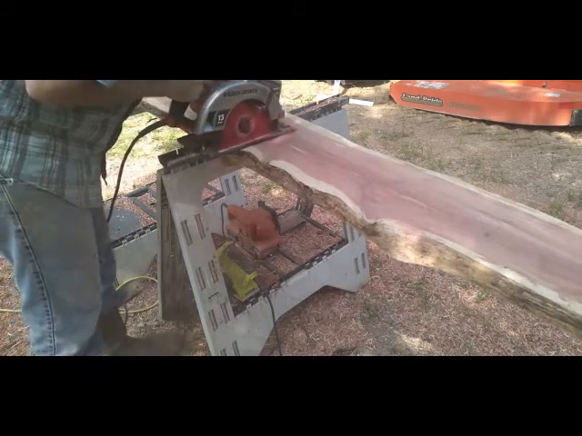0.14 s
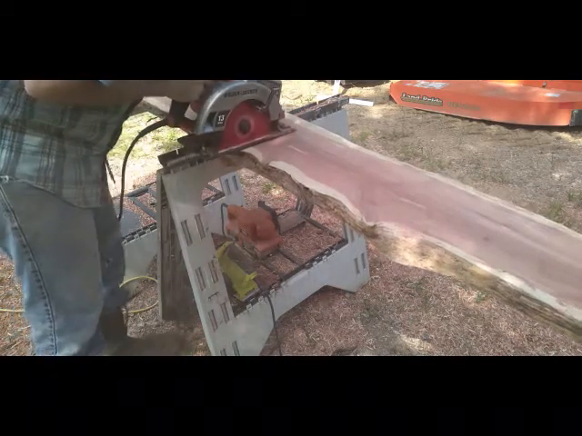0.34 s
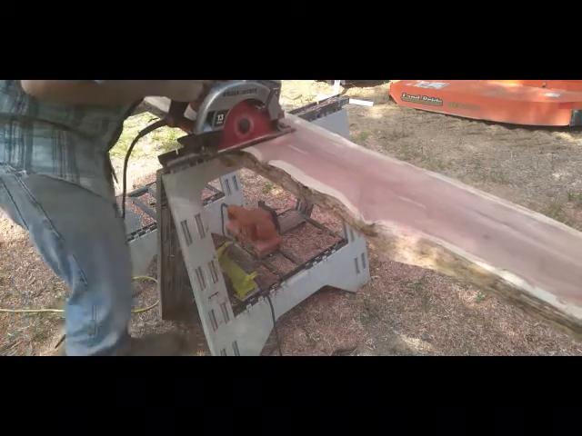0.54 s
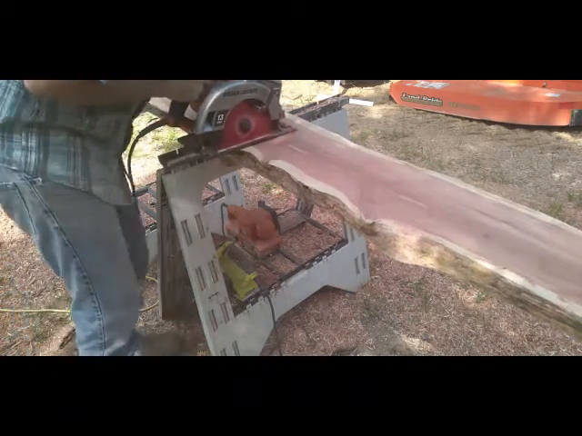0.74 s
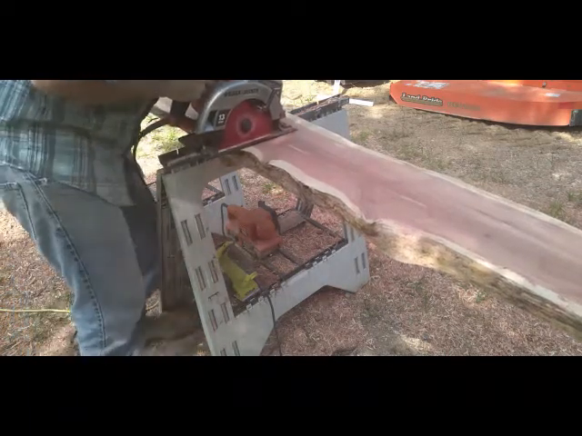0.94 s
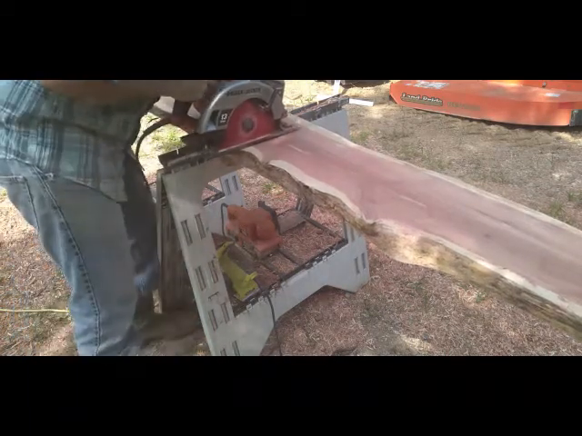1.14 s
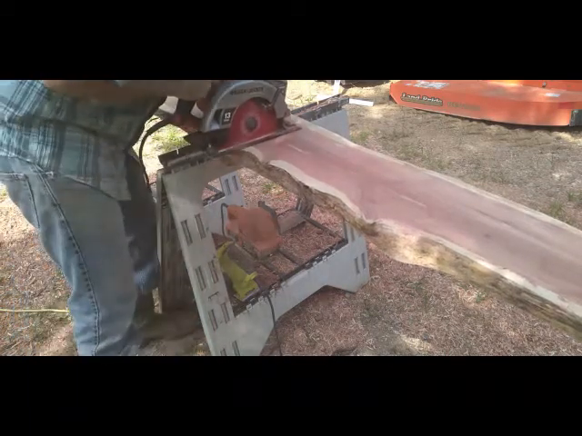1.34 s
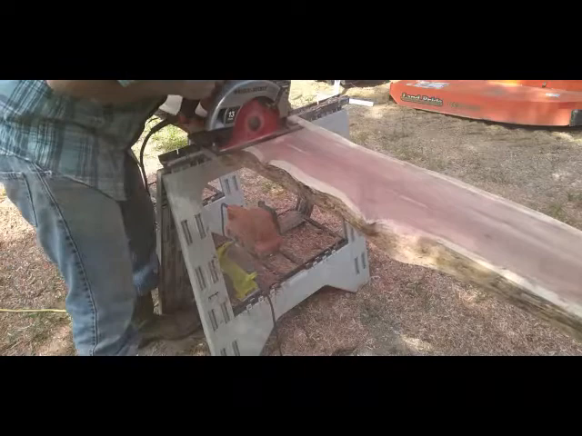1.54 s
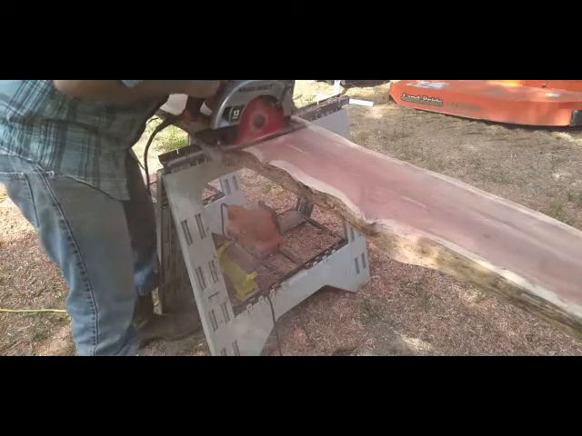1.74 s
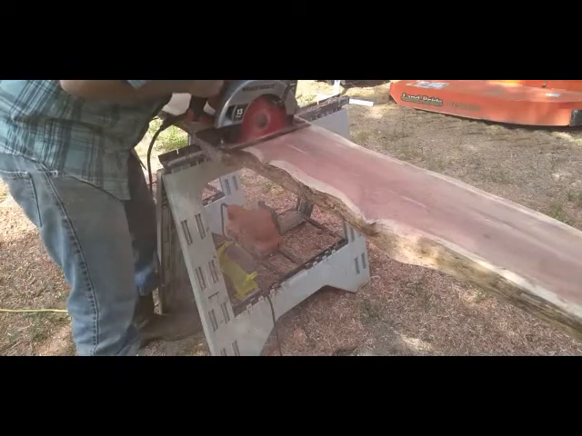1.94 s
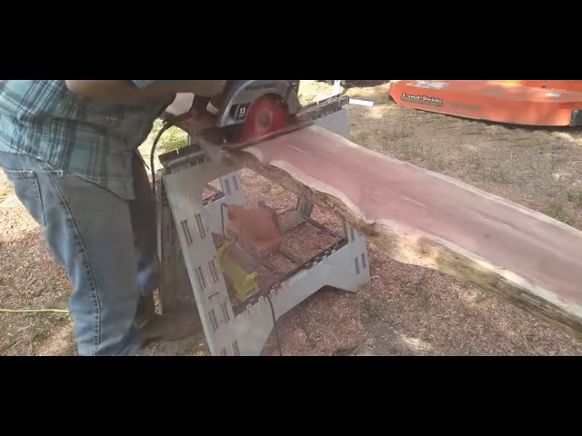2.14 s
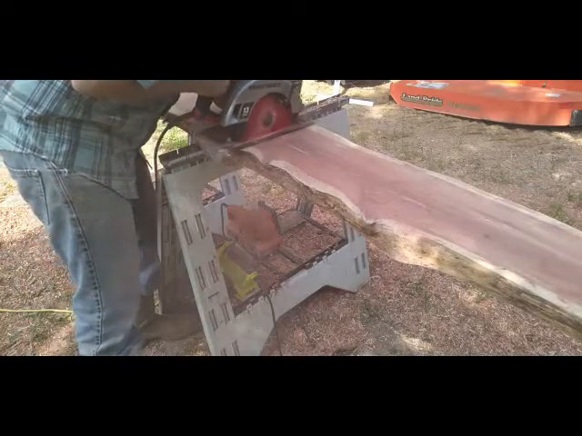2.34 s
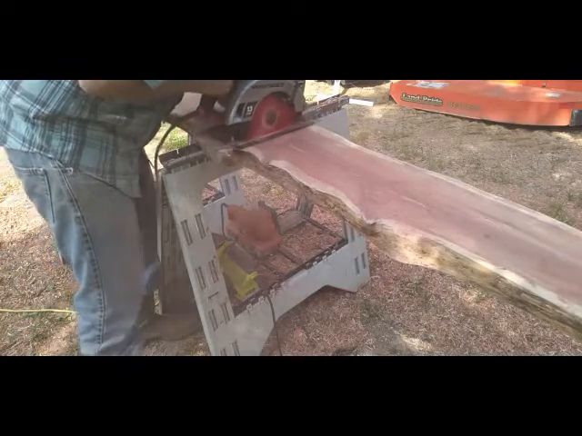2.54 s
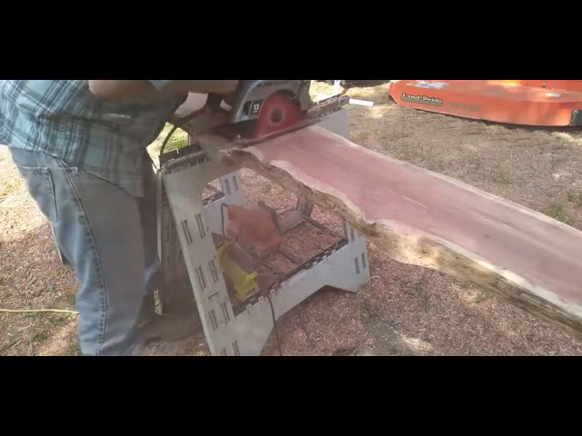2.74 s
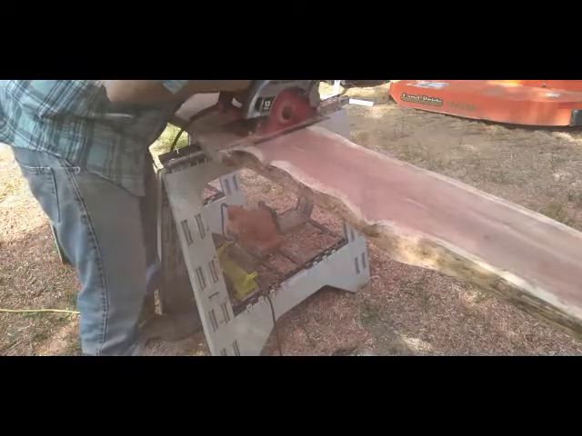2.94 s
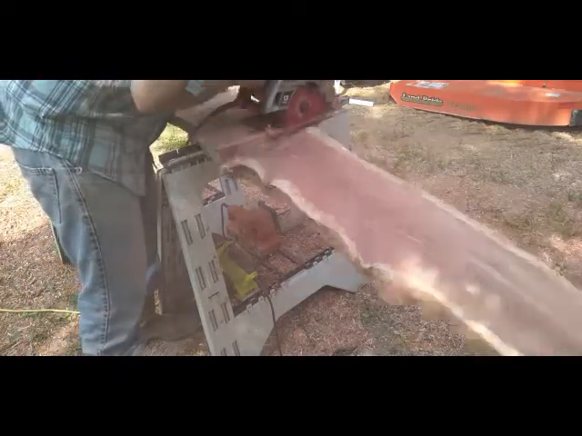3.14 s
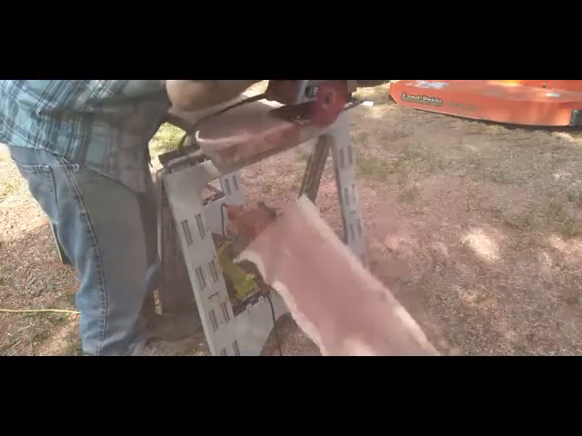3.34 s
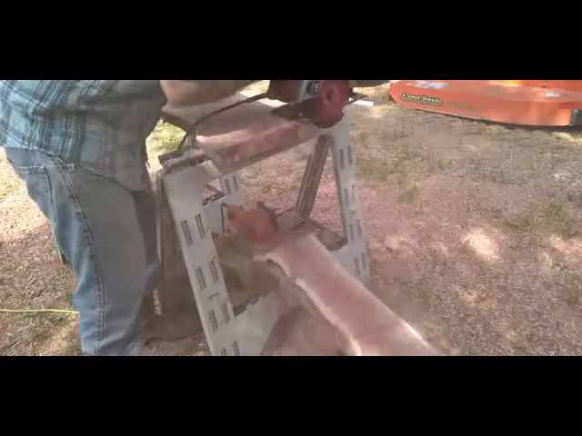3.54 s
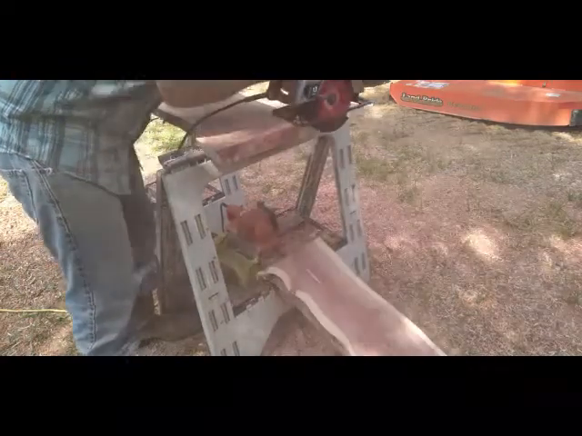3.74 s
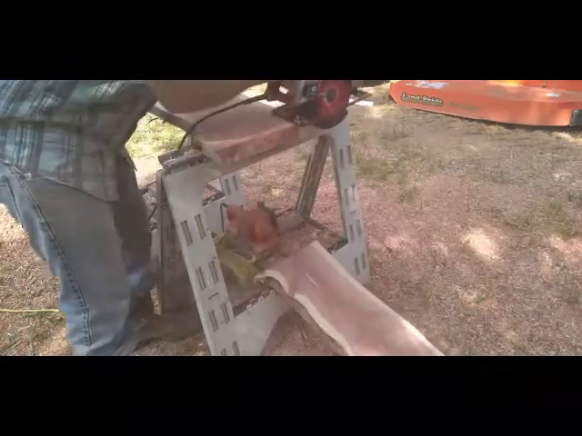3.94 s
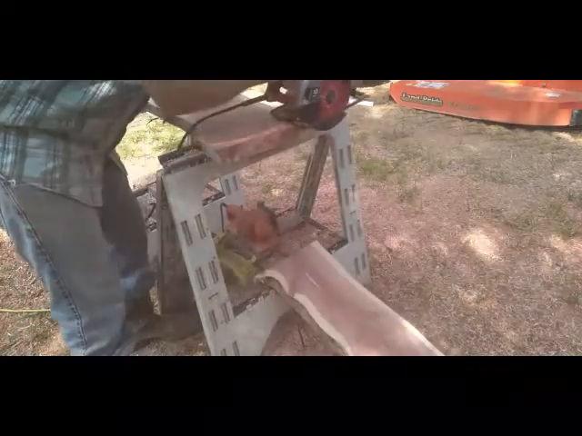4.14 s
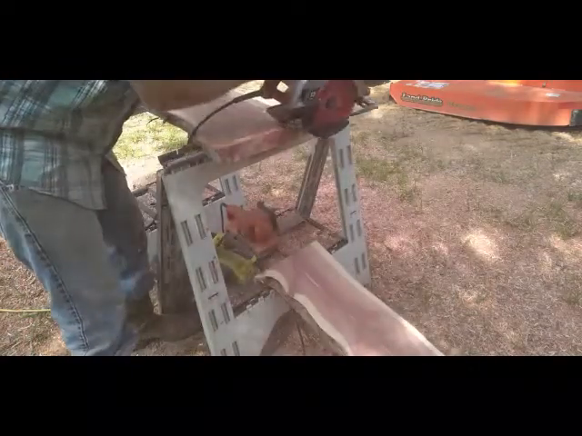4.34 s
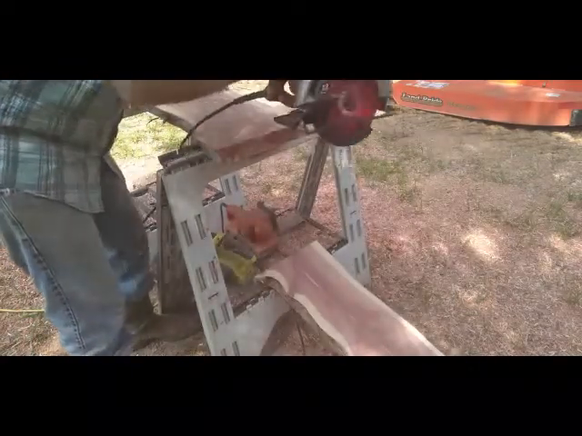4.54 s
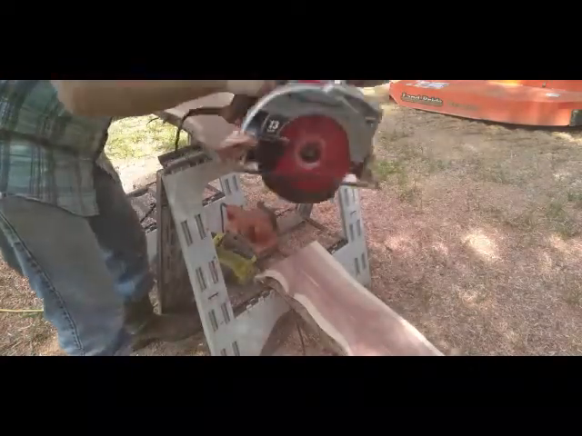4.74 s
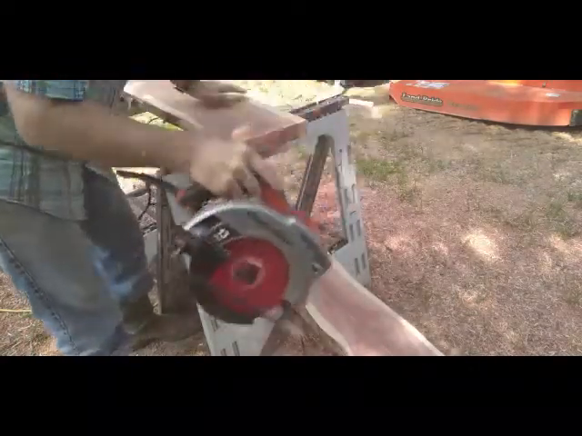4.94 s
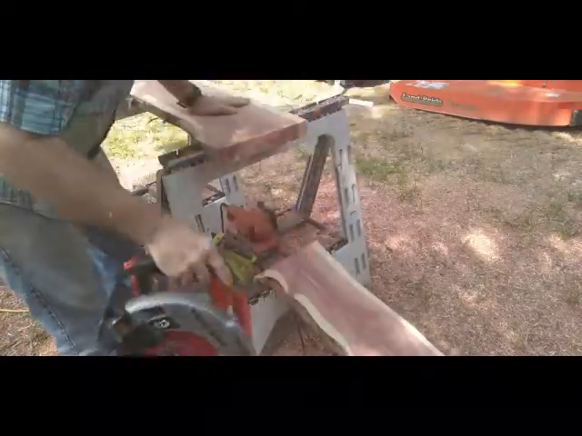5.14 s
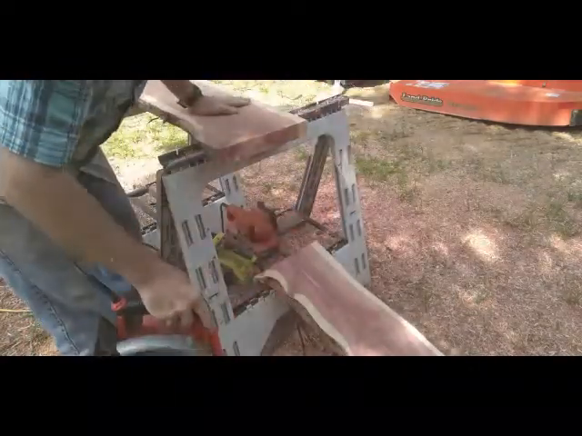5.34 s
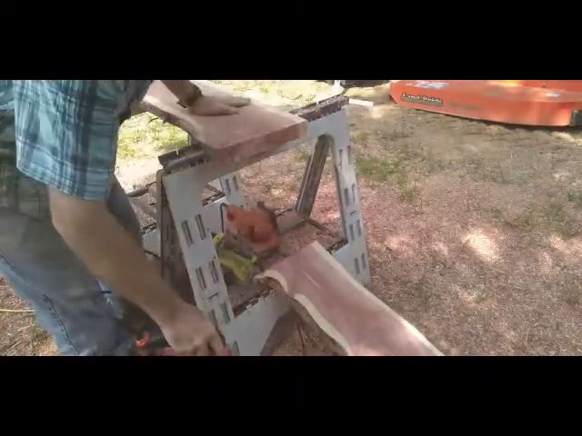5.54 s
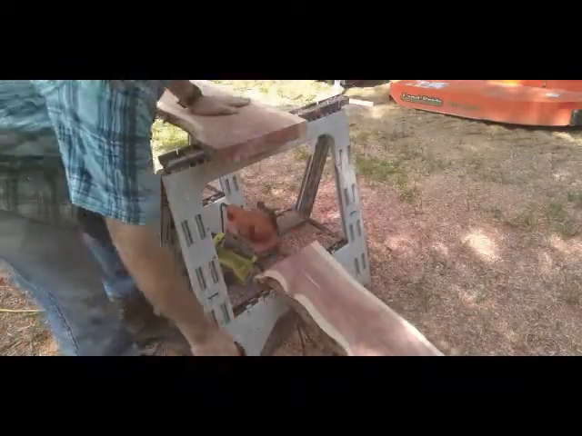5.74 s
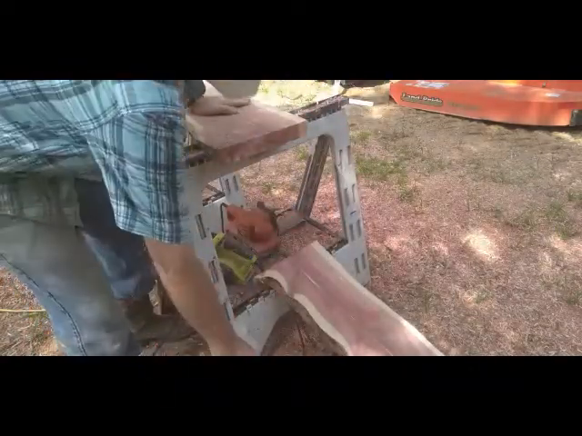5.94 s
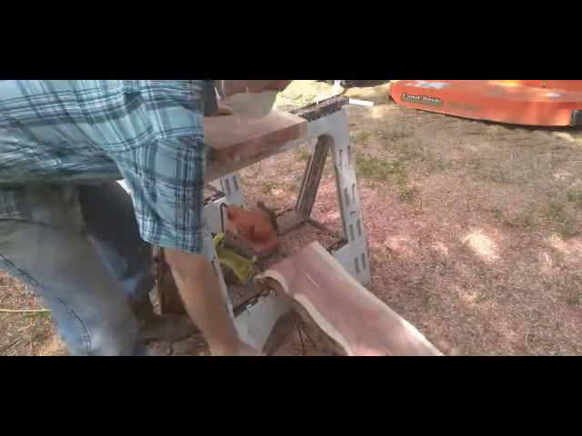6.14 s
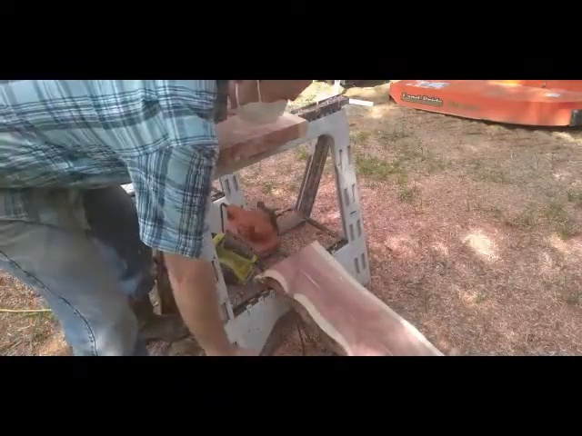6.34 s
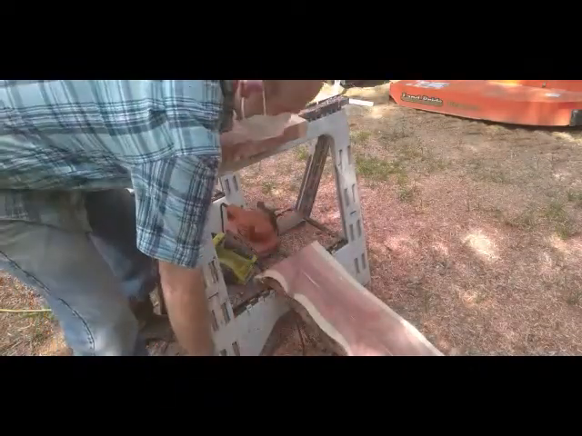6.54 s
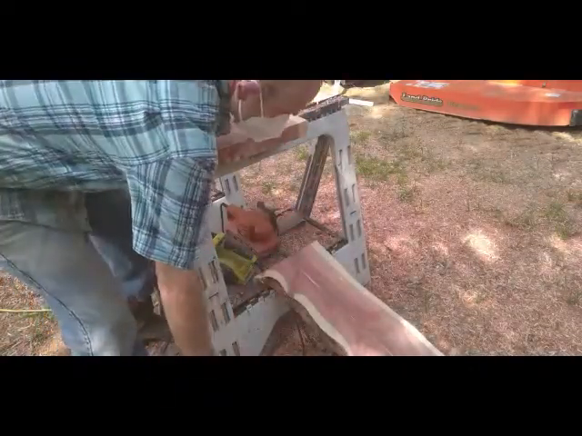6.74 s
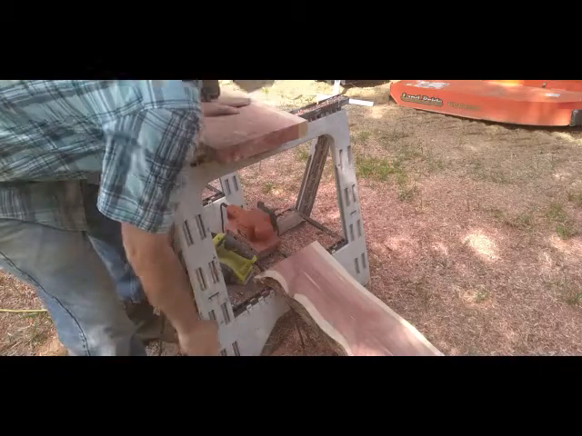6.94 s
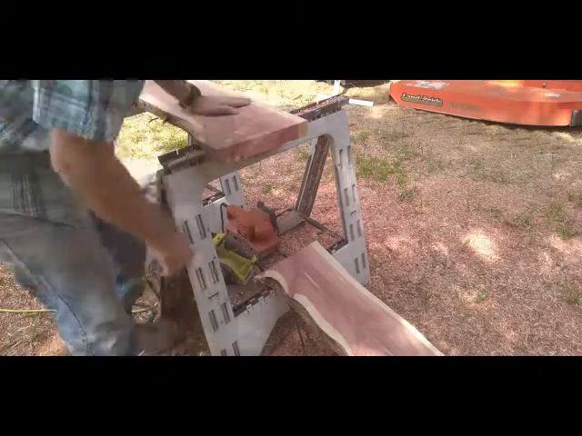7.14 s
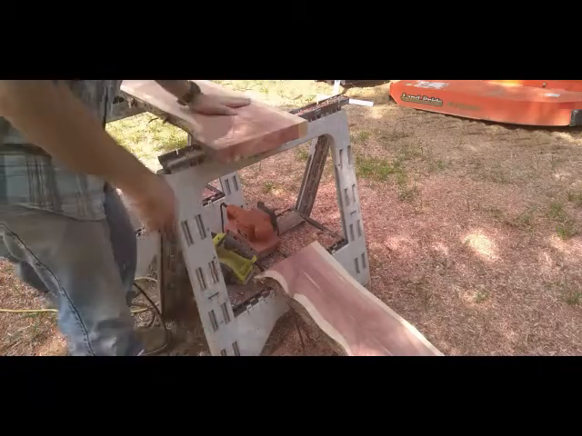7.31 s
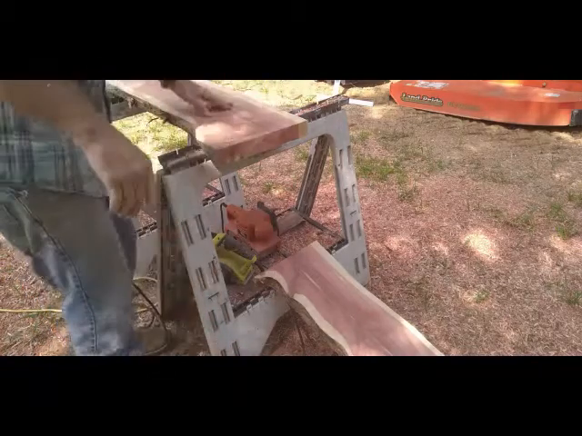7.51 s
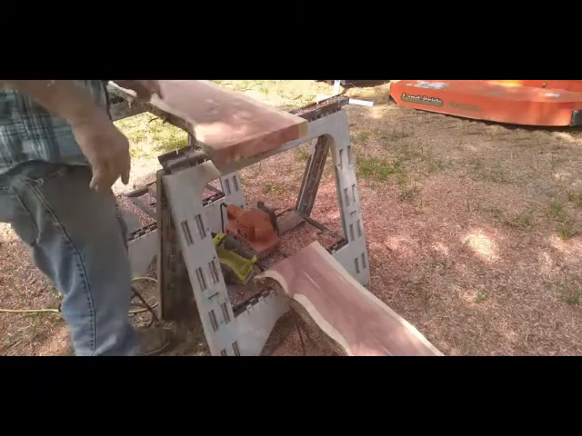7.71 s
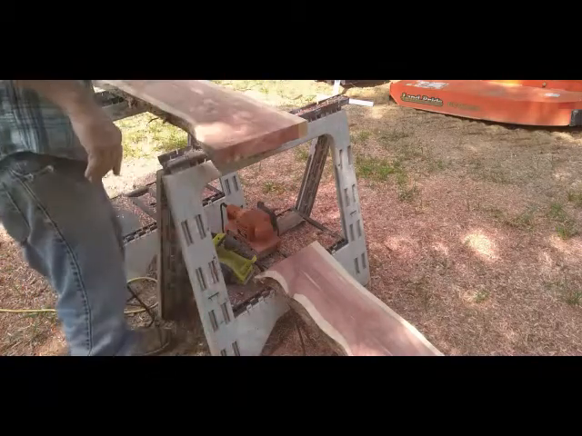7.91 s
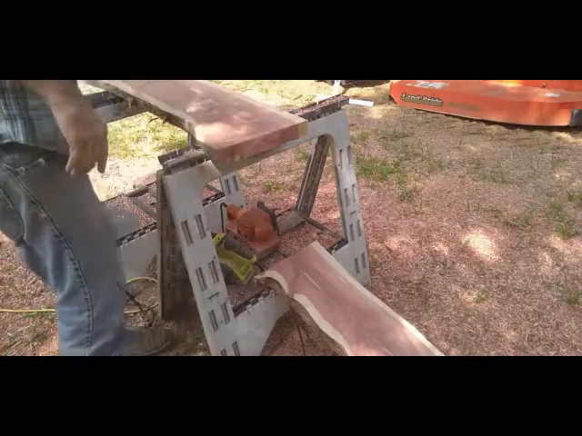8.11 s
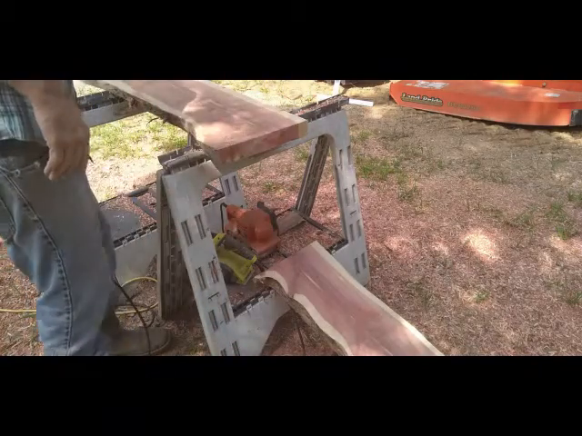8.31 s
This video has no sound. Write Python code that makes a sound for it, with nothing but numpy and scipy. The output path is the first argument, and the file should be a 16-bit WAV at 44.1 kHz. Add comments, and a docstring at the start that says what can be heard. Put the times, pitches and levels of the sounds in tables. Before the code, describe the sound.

From the start, a circular saw cuts loudly through a thick wooden slab outdoors: a high, ringing blade scream over a rough drone and low rumble, the motor's pitch wavering and sagging under load. At about 3.2 seconds the blade comes free with a short scrape and the motor races up. At 3.4 seconds the offcut thuds on the ground and bounces quickly, settling before 4 seconds. From about 3.6 seconds the saw coasts, its gear whine, rattle, fan hiss and thin blade whistle falling and fading with a pulsing flutter. Near 6.9 seconds it is set down with a sharp knock and a small clatter. Faint gear ticks follow until about 7.9 seconds, leaving quiet garden air and one barely audible bird note near the end. The close stereo microphone overloads on the loudest peaks and catches light wind gusts in the second half.

```python
"""A circular saw screams and drones through a thick slab outdoors, its teeth tearing chips that ring
the blade. The offcut drops, and the motor races free, then coasts while the saw is lowered and set on
the ground. The gears whine through the housing, the fan hisses and the blade teeth whistle.
A small stereo microphone overloads on the loudest peaks and catches some wind."""
import sys
import numpy as np
from scipy import signal
from scipy.fft import rfft, irfft, next_fast_len
from scipy.io import wavfile
from scipy.ndimage import uniform_filter1d, map_coordinates

SR = 44100
rng = np.random.default_rng(int(sys.argv[2]) if len(sys.argv) > 2 else 0)


def to_wav(sig):
    """Store sig (one row per channel, or 1-D mono) as 16-bit WAV at the path in sys.argv[1].

    Samples outside -1..1 are clipped; the rate is SR.
    """
    pcm = np.clip(np.atleast_2d(sig), -1, 1) * 32767
    pcm = np.round(pcm).astype(np.int16)
    wavfile.write(sys.argv[1], SR, pcm.T)  # frames by channels


N = 373516
T = np.arange(N) / SR
FFT_SIZE = next_fast_len(N + SR // 4)
HZ = np.arange(FFT_SIZE // 2 + 1) * SR / FFT_SIZE + 0.0013
SIDES = np.array([[.5], [-.5]])  # shares a gap in dB between left and right

# The motor, bogged down in the wood, then racing free: (time [s], speed [turns/s])
POWERED_SPEED = [(0.0, 206.7), (0.6, 222), (1.0, 226.8), (1.2, 217.2), (1.6, 204.3), (2.2, 198.4),
                 (2.55, 204.5), (2.8, 191.7), (3.0, 178.7), (3.15, 186.4), (3.25, 351), (3.35, 390),
                 (3.45, 413), (3.55, 429.5)]
# Levels during the cut: (time [s], blade's scream [dB], low rumble at the microphone [dB])
CUT_LEVELS = [(0.0, -2.5, -28), (0.96, -8, -31.5), (1.1, -8, -29.5), (1.75, -9.5, -41), (2.2, -11, -40),
              (2.54, -9.5, -39.5), (2.85, -10, -30.5), (3.04, -9.5, -30.5), (3.19, -12, -37.5),
              (3.28, -23, -73)]
# Modes, the pitches at which a part rings: (pitch [Hz], width [Hz], gain [dB], left minus right [dB])
BLADE_MODES = [(1366, 83, -38.5, -2), (1667, 320, -5.5, 2.5), (2758, 170, -21.5, -5), (3220, 85, -10, 6.5),
               (4165, 73, -9.5, -1), (4607, 80, -13.5, 2.5), (5236, 100, -9, -2.5), (5685, 100, -13.5, 7),
               (6303, 74, -12.5, 14.5), (6786, 63, -15, 11.5), (7265, 43, -7.5, 15), (7865, 96, -5, 16),
               (8184, 150, -5, 16), (8616, 110, 0.5, 13.5), (9080, 170, 2, 10.5), (9985, 260, 3, 7.5),
               (10670, 130, 2, -7), (11180, 82, 1.5, -0.5), (11650, 230, -4.5, -5.5),
               (12480, 360, -4.5, -7)]
HOUSING_MODES = [(570, 185, -0.5, 0.5), (806, 180, 4.5, 2), (1073, 410, 2, -2), (1496, 140, 5.5, 1.5),
                 (1780, 790, -5, -5), (2093, 110, 7.5, 4), (2232, 93, 8, -7), (2473, 39, 7.5, 4.5),
                 (2667, 220, 4.5, -4), (3350, 72, -13, 0), (3368, 130, 1.5, -4), (3800, 180, -4, 14.5),
                 (4473, 270, -5.5, -18), (5230, 290, -1, 17.5), (5810, 63, -1.5, 17), (6360, 320, -3, 18.5),
                 (7100, 110, -3, 27.5), (7870, 210, 6.5, 16.5), (8970, 470, -0.5, 19),
                 (10110, 260, -10, -17), (10180, 150, 0.5, -21.5), (10985, 130, 4.5, -26)]
SLAB_MODES = [(124, 77, -7, 0.0099), (166, 13, -1, 0.0043), (217, 39, -0.5, 0.001), (285, 29, 6.5, 0.012),
              (310, 22, 7.5, 0.0031), (357, 57, 0.5, 0.01), (486, 13, 4.5, 0.0083), (620, 76, -5, 0.013),
              (937, 1500, -8, 0.003), (1577, 320, -30, 0.011)]
# Colours, how strong each noise is from bass to treble: (frequency [Hz], gain [dB])
CHIP_COLOUR = [(1530, -52.5), (2600, -56), (3360, -10.5), (4370, -18.5), (5160, -28), (5730, -36),
               (6220, -14), (9410, -3), (15700, -9.5)]
DRONE_COLOUR = [(260, -50), (450, -15), (827, -2.5), (1050, -2), (2060, -3.5), (2430, -10.5), (2600, 4),
                (3380, -45), (5720, -120)]
RUMBLE_COLOUR = [(15, -48), (32, -33), (70, -1.5), (134, 2.5), (221, -2.5), (361, -2.5), (500, -9.5),
                 (650, -41.5), (1100, -120)]
RATTLE_COLOUR = [(210, -50), (350, -17), (578, -14.5), (1450, -6), (1760, -8), (3480, -13.5), (4000, -16),
                 (4500, -15), (5850, -33), (9900, -120)]
HISS_COLOUR = [(1760, -24), (3000, -3.5), (3540, -3.5), (4040, -6.5), (4510, -9), (4870, -8.5), (5260, -7),
               (10900, -0.5), (15700, -28)]
GARDEN_COLOUR = [(180, -35.5), (300, -4.5), (680, -11), (884, -5), (1170, -16), (10500, -13),
                 (13400, -24.5), (15000, -12)]
WIND_COLOUR = [(12, -66.5), (20, -30), (78, -1.5), (134, -9.5), (211, -24.5), (278, -23), (400, -39.5),
               (520, -57.5), (880, -120)]
# The housing as the saw is lifted, turned and lowered: (time [s], relative level [dB])
HOUSING_LEVELS = [(3.16, -25.5), (3.3, -26), (3.39, -22), (3.52, -17), (3.75, -19), (4.26, -23),
                  (4.65, -20), (4.81, -18), (5.11, -24), (5.42, -29), (5.9, -30), (6.07, -32.5),
                  (6.28, -29.5), (6.65, -34), (6.85, -38), (7.13, -33.5), (7.28, -33.5), (7.59, -41),
                  (7.77, -54), (8.1, -74)]
# Brief dips in the gear and fan sound: (middle [s], length [s], change [dB])
LEVEL_DIPS = [(3.273, .08, -1), (6.469, 0.055, -5), (6.892, 0.017, 0), (7.05, 0.045, -13.5)]
# Moments when one housing mode sings out: (middle [s], length [s], pitch [Hz], level [dB])
HOUSING_SURGES = [(3.714, 0.7, 2764, -18.5), (3.734, 0.26, 3300, -21.5), (3.903, 0.17, 5370, -33),
                  (4.18, 0.86, 2315, -27.5), (4.236, 0.23, 4510, -33), (4.792, 0.48, 1760, -24),
                  (5.138, 0.052, 9240, -27), (5.398, 0.18, 7810, -32), (5.664, 0.34, 10380, -36),
                  (5.86, 0.13, 9900, -35), (5.843, 0.38, 2250, -42), (5.938, 0.19, 2954, -34),
                  (6.1, 0.21, 2770, -29), (6.38, 0.15, 1580, -33), (6.746, 0.77, 550, -39.5),
                  (6.693, 0.34, 2670, -34.5), (6.82, 0.18, 1067, -48), (7.298, 0.49, 2350, -41.5),
                  (7.253, 0.54, 1410, -42), (7.605, 0.19, 556, -48.5)]
# Motor tones that swell and fade: (middle [s], length [s], order [cycles/turn], level [dB])
MOTOR_TONES = [(0.0, 0.54, 8, -23), (0.63, .8, 7, -31), (0.87, 0.84, 6, -25.5), (1.1, 0.22, 7, -29),
               (1.31, .6, 8, -27.5), (2.8, 0.28, 8, -33), (0.4, .5, 24, -29), (0.2, .6, 32, -24),
               (0.3, .3, 39, -28.5), (0.5, .35, 32, -28), (.95, .25, 16, -35), (1.25, .5, 32, -33),
               (1, .5, 39, -34), (4.5, .37, 7, -30), (4.62, .2, 21, -35), (4.9, .3, 14, -34),
               (5.0, .15, 28, -37), (5.6, .3, 21, -38), (5.87, .27, 14, -35), (5.85, .3, 21, -41),
               (6.1, .5, 42, -43), (6.32, .32, 14, -37), (6.78, .22, 14, -44), (7.16, .18, 14, -44),
               (7.29, .24, 21, -43), (7.38, .2, 14, -48)]
# The whistle of the blade teeth: (time [s], level [dB])
WHISTLE_LEVELS = [(3.25, -53), (3.52, -25.5), (3.7, -27), (3.9, -35), (4.1, -26.5), (4.3, -30),
                  (4.7, -35.5), (5.0, -38), (5.3, -52), (5.75, -69), (7.0, -85), (7.3, -75)]
# The band lifted by the echo off the ground: (time [s], pitch [Hz], level [dB])
GROUND_BAND = [(4.8, 520, -66), (5.0, 586, -34), (5.4, 658.5, -39), (5.9, 745, -43), (6.3, 816, -43),
               (6.5, 834, -49)]
# The offcut lands and bounces: (time [s], relative level [dB], length of the push [ms])
OFFCUT_BOUNCES = [(3.401, -3.5, 5.5), (3.437, -13, 0.71), (3.466, -10.5, 2.34), (3.493, -10, 0.99),
                  (3.521, -11, 1.4), (3.611, -15, 1.4), (3.646, -17.5, 1.8), (3.712, -19.5, 1.7),
                  (3.766, -25.5, 1.3), (3.808, -38.5, 1.8), (3.851, -37, 1)]
# The saw set down, then the last gear ticks: (time [s], relative level [dB], pitch [Hz])
HOUSING_KNOCKS = [(6.919, 4, 923), (6.949, -14, 1310), (6.988, -8.5, 1430), (7.01, -13, 2320),
                  (7.072, -25, 2500), (7.107, -22, 1370), (7.724, -32, 950), (7.746, -36, 1000),
                  (7.775, -36, 985), (7.815, -43, 1000), (7.83, -35, 1300), (7.861, -37, 897),
                  (7.881, -40, 980), (7.904, -42.5, 980)]
# Scrapes, rustles and one faint bird note: (start [s], length [s], level [dB], centre [Hz], width [Hz])
RUSTLES_AND_BIRD = [(3.12, 0.14, -31, 1110, 89), (3.11, 0.18, -33, 1483, 90), (3.1, 0.081, -17, 8900, 6000),
                    (3.315, .08, -20, 8500, 6000), (6.908, 0.15, -33, 7500, 6000),
                    (6.925, .12, -35, 1300, 1800), (2.05, .3, -33, 1050, 220),
                    (7.56, 0.056, -50, 8900, 5500), (8.29, 0.07, -55, 9500, 8000),
                    (8.2, 0.16, -63.5, 260, 900), (8.18, 0.11, -70.5, 2400, 79),
                    (8.42, 0.055, -71, 2200, 96)]
# Gusts on the microphone: (middle [s], length [s], level [dB])
GUSTS = [(5.367, 0.26, -36.5), (5.66, 0.28, -54), (5.833, 0.11, -60), (6.016, 0.082, -53), (6.3, 0.54, -46),
         (6.714, 0.079, -49), (6.996, 0.24, -53.5), (7.234, 0.23, -47.5), (8.242, 0.13, -63.5),
         (8.48, 0.079, -37)]

PINION_TEETH, GEAR_TEETH, BLADE_TEETH = 7, 40, 60  # the pinion is the small gear on the motor
GEAR_RATIO = PINION_TEETH / GEAR_TEETH  # blade turns for each motor turn


def undb(db):
    """Turn decibels into a factor to multiply by."""
    return 10 ** (np.asarray(db) / 20)


def unit(x):
    """Scale a sound to an average power of 1."""
    return x / np.sqrt(np.mean(x ** 2))


def curves(table, outside=-120.):
    """A table's columns at every sample; `outside` fills in before and after its times."""
    times, *columns = np.transpose(table)
    return [np.interp(T, times, column, outside, outside) for column in columns]


def bump(middle, length):
    """An arch: 1 in the middle of an event, 0 at its ends, negative beyond them."""
    return 1 - ((T - middle) / (length / 2)) ** 2


def wander(rate):
    """Glide to a new random value `rate` times a second, with a spread near 1."""
    hold = int(SR / rate)
    return 1.62 * uniform_filter1d(np.repeat(rng.standard_normal(N // hold + 1), hold), hold)[:N]


def noise(apart_hz):
    """Stereo noise, alike on both sides in the bass and unrelated above apart_hz."""
    shared, *own = rfft(rng.standard_normal((3, N)), FFT_SIZE)
    alike = lowpass(apart_hz, 2)
    return irfft(shared * np.sqrt(alike) + np.array(own) * np.sqrt(1 - alike), FFT_SIZE)[:, :N]


def through(x, response):
    """Filter a sound: multiply each frequency by its own gain."""
    return irfft(rfft(x, FFT_SIZE) * response, FFT_SIZE)[..., :N]


def lowpass(hz, steep):
    """A filter that keeps what lies below hz."""
    return 1 / (1 + (HZ / hz) ** steep)


def highpass(hz):
    """A filter that keeps what lies above hz."""
    return 1 / (1 + (hz / HZ) ** 4)


def bandpass(hz, width):
    """A filter that keeps what lies around hz."""
    return 1 / (1 + ((HZ - hz ** 2 / HZ) / width) ** 2)


def resonance(hz, width):
    """A filter that rings at hz; the narrower it is, the longer it rings."""
    return 1 / (1 + 1j * (HZ - hz ** 2 / HZ) / width)


def modes(table, steep=1):
    """A stereo filter of many resonances; steep=2 deepens the valleys between them."""
    return sum((-1) ** k * undb(db + SIDES * pan_db) * resonance(hz, width) ** steep
               for k, (hz, width, db, pan_db) in enumerate(table))


def colour(table):
    """A broad filter drawn through the points of a colour table."""
    hz, db = np.transpose(table)
    return undb(np.interp(np.log(HZ), np.log(hz), db, -90, -90))


def blows(hits, tail_s=0):
    """A smooth push for each (time [s], level [dB], length [ms]); tail_s smears it into fading noise."""
    out = np.zeros(N)
    for start, db, length_ms in hits:
        push = np.hanning(int(length_ms / 1000 * SR) + 3)
        push /= np.sqrt(len(push))
        if tail_s:
            fade = np.exp(-np.arange(int(5 * tail_s * SR)) / (tail_s * SR))
            push = np.convolve(push, rng.standard_normal(len(fade)) * fade)
        out[int(start * SR):][:len(push)] += undb(db) * push
    return out


def cutting(speed, turns):
    """Teeth tear uneven chips: the blade screams and the slab drones, over a rumble at the microphone."""
    scream_db, rumble_db = curves(CUT_LEVELS)
    tooth = (turns * GEAR_RATIO * BLADE_TEETH).astype(int)
    bite = undb(0.7 * rng.standard_normal(N // 4)[tooth] + wander(40))
    chips = bite * noise(4900) + undb(-15) * gear_taps(speed, turns)
    buzz = undb(.5) * np.array([motor_buzz(turns), motor_buzz(turns)])
    blade = blade_ring(chips + .5 * buzz)
    blade += undb(-2) * through(bite * noise(1200) + buzz, colour(CHIP_COLOUR))
    below_scream = np.sqrt(lowpass(6400, 16))
    scream = through(blade, np.sqrt(1 - below_scream ** 2))
    midrange = through(blade, below_scream * (HZ > 2500)) * undb(SIDES * 2.4)
    drone = through(noise(907), colour(DRONE_COLOUR) + undb(-19.5) * modes(HOUSING_MODES[:7]))
    drone *= undb(1.1 * wander(11) + SIDES * 2)
    # the slab drones most where the blade is buried and screams less
    drone_db = np.where(T < 3.2, -37 - 0.78 * np.clip(scream_db, -12, 0), -120)
    rumble = through(noise(8.9), colour(RUMBLE_COLOUR)) * undb(SIDES * 4.6)
    return (unit(scream) * undb(scream_db) + unit(midrange) * undb(-13.5 + 0.83 * scream_db)
            + unit(drone) * undb(drone_db) + unit(rumble) * undb(rumble_db))


def blade_ring(chips):
    """The blade bends in the cut: groups of modes swell separately and all drift a little in pitch."""
    ring = sum(through(chips * undb(1.8 * wander(9)), modes(BLADE_MODES[k::3])) for k in range(3))
    position = np.arange(N) + np.cumsum(.002 * wander(9))
    return np.array([map_coordinates(side, [position], order=3, mode="reflect") for side in ring])


def motor_motion():
    """Speed [turns/s] and turns so far: the motor is driven, then drag slows it to a crawl."""
    brush_drag, bearing_drag, fan_drag = 57.3, .1127, .000427
    step_s, slowest = .01, 3.
    times, speeds = map(list, np.transpose(POWERED_SPEED))
    while times[-1] < T[-1]:
        drag = brush_drag + bearing_drag * speeds[-1] + fan_drag * speeds[-1] ** 2
        times.append(times[-1] + step_s)
        speeds.append(max(speeds[-1] - drag * step_s, slowest))
    speed = np.interp(T, times, speeds)
    return speed, np.cumsum(speed) / SR


def motor_buzz(turns):
    """The straining motor repeats a rough pattern every turn; it slowly changes, so the buzz wavers."""
    points, change_s = 160, .1
    patterns = rng.standard_normal((int(T[-1] / change_s) + 2, points))
    loops = np.hstack([patterns, patterns[:, :1]])
    return unit(map_coordinates(loops, [T / change_s, turns % 1 * points], order=1))


def motor_tones(turns):
    """Multiples of the motor's speed swell and fade; coasting, they blur and throb with the blade."""
    out, flicker, waver = np.zeros(N), wander(27), wander(60)
    coasting = T > POWERED_SPEED[-1][0]
    blur = .65 * coasting * wander(170)
    throb_db = 4 * coasting * np.cos(2 * np.pi * turns * GEAR_RATIO)
    for k, (middle, length, order, db) in enumerate(MOTOR_TONES):
        span = slice(max(int((middle - length) * SR), 0), int((middle + length) * SR))
        shift = 9000 * k  # gives each tone its own waver and flicker
        angle = 2 * np.pi * order * turns + (.4 + .018 * order) * np.roll(waver, shift) + blur
        level_db = db + 11.5 * (bump(middle, length) - 1) + 1.1 * np.roll(flicker, shift) + throb_db
        out[span] += undb(level_db[span]) * np.sqrt(2) * np.sin(angle[span])
    return out * undb(SIDES * 3.3)


def free_running(speed, turns):
    """Out of the wood, the gears whine and rattle and the fan blows, pulsing as the parts turn."""
    housing_db = curves(HOUSING_LEVELS)[0]
    speed_db = 20 * np.log10(speed / 300)
    dip_db = sum(db * np.maximum(bump(middle, length), 0) for middle, length, db in LEVEL_DIPS)
    # the gear sits off centre, so it presses harder once per blade turn
    wobble_db = 7 * np.clip(speed / 300, .3, 1) * np.cos(2 * np.pi * turns * GEAR_RATIO)
    chatter_db = gear_chatter_db(speed, turns)
    whine = gear_whine(speed, turns, pulse_db=wobble_db + chatter_db + dip_db,
                       force_db=0.86 * housing_db + 0.16 * speed_db)
    rattle = housing_rattle(0.095 * wobble_db) * undb(housing_db + dip_db - 5.5)
    fan_db = -20.5 + 1.73 * speed_db + 0.15 * (housing_db + 11.5) + dip_db
    fan_db -= 99 * (T < HOUSING_LEVELS[0][0])  # silent until the blade leaves the wood
    return whine + rattle + fan(speed, 0.23 * wobble_db + 0.99 * chatter_db) * undb(fan_db)


def gear_taps(speed, turns):
    """Each gear tooth taps and rebounds; the loudness stays steady, the timing loosens as they slow."""
    teeth_passed = turns * PINION_TEETH
    tooth = teeth_passed.astype(int)
    slack = 1 + (45 / (speed + 5)) ** 2
    timing_luck, strength_luck = rng.standard_normal((N // 4, 2))[tooth].T
    contact_s = 1.2e-5 * (1 + (63 / (speed + 20)) ** 2)  # slower teeth meet more softly
    tap_width = speed * PINION_TEETH * contact_s
    late = np.clip(.005 * slack * timing_luck + .022 * wander(250), -.2, .2)
    taps = sum(size * np.exp(-(((teeth_passed + shift) % 1 - .5 - late) / tap_width) ** 2)
               for shift, size in ((0, 0.85), (.5, 0.55)))
    # neighbouring teeth are worn alike
    wear_db = 3 * uniform_filter1d(rng.standard_normal(GEAR_TEETH), size=5, mode="wrap")
    pinion_db = 4.7 * np.clip(speed / 150, .25, 1) * np.cos(2 * np.pi * turns)
    uneven_db = 2.5 * wander(300) + np.minimum(slack, 1.6) * strength_luck
    taps *= undb(wear_db[tooth % GEAR_TEETH] + pinion_db + uneven_db)
    taps -= uniform_filter1d(taps, size=70)  # takes out the bass
    return taps / np.sqrt(uniform_filter1d(taps ** 2, size=8000) + 1e-9)


def gear_chatter_db(speed, turns):
    """Level flutter: slack gears chatter, and the slowing motor catches twice a turn, heard as ticks."""
    chatter_hz = 60.54 * (1 + 0.0975 * wander(16))
    depth_db = 3.5 * np.clip(2 * bump(middle=6.1, length=1.9), 0, 1)
    catch_db = 7 * np.clip(2 - 2 * speed / 85, 0, 1) * np.cos(2 * np.pi * 2 * turns)
    return depth_db * np.cos(2 * np.pi * np.cumsum(chatter_hz) / SR) + catch_db


def gear_whine(speed, turns, pulse_db, force_db):
    """Grinding gears ring the housing; at the listed moments one mode sings out above the rest."""
    grind = gear_taps(speed, turns) + .7 * rng.standard_normal(N)
    grind -= through(grind, highpass(3600)) * np.clip(1 - speed / 170, 0, .9)  # slow teeth sound dull
    housing = through(grind * undb(pulse_db + force_db), modes(HOUSING_MODES, steep=2))
    whine = unit(housing) * undb(-31)
    rough_grind = (grind + 0.82 * rng.standard_normal(N)) * undb(pulse_db)
    for middle, length, hz, db in HOUSING_SURGES:
        swell = np.maximum(bump(middle, length), 0)
        ring = through(rough_grind * swell, resonance(hz, width=0.024 * hz + 40) ** 2)
        whine += ring * undb(db) * np.sqrt(np.sum(swell ** 2) / np.sum(ring ** 2))
    return whine


def housing_rattle(pulse_db):
    """The housing rattles: broad noise with a little ring from its lower modes."""
    ringing = undb(-8.5) * modes(HOUSING_MODES, steep=2) * lowpass(4000, 4)
    return unit(through(undb(pulse_db) * noise(3000), colour(RATTLE_COLOUR) + ringing))


def fan(speed, pulse_db):
    """The fan and the motor's brushes hiss, over a low whoosh that fades as the fan slows."""
    hiss = unit(through(noise(2600), colour(HISS_COLOUR))) * undb(pulse_db + wander(30))
    whoosh = unit(through(noise(900), bandpass(260, width=300))) * (speed / 300) ** 0.65
    return hiss + whoosh * undb(-28)


def blade_whistle(turns):
    """The blade whistles at the rate its teeth pass through the air."""
    angle = 2 * np.pi * BLADE_TEETH * GEAR_RATIO * turns + 1.3 * wander(150)
    return np.sqrt(2) * np.sin(angle) * undb(curves(WHISTLE_LEVELS)[0] + 2 * wander(23))


def ground_echo():
    """A narrow, rising band of noise stands for the echo off the ground as the saw is lowered."""
    hz, db = curves(GROUND_BAND, outside=0.)
    slow_noise = through(rng.standard_normal((2, N)), lowpass(45, 2))
    angle = 2 * np.pi * np.cumsum(hz) / SR
    band = slow_noise[0] * np.cos(angle) + slow_noise[1] * np.sin(angle)
    return unit(band) * undb(db) * (hz > 0)


def offcut_drop():
    """The offcut thuds and scuffs on the ground; each bounce rings the wood."""
    force = blows(OFFCUT_BOUNCES) + undb(-24.5) * blows(OFFCUT_BOUNCES, tail_s=.018)
    return through(force, modes(SLAB_MODES) * highpass(65)) * undb(31)


def knocks():
    """Knocks ring the housing with a crack, each one most at its own pitch."""
    hits = [(start, db, .3) for start, db, _ in HOUSING_KNOCKS]
    crack = blows(hits, tail_s=0.0041) * undb(-25)
    housing = through(blows(hits) + crack, modes(HOUSING_MODES[:8]))
    pings, age = np.zeros(N), np.arange(SR // 20) / SR
    fade = age / 0.0017 * np.exp(-age / 0.0026)
    for start, db, hz in HOUSING_KNOCKS:
        pings[int(start * SR):][:len(age)] += undb(min(db, -5)) * np.sin(2 * np.pi * hz * age) * fade
    body = through(housing * undb(8) + pings * undb(-5.5), highpass(420))
    snap = through(crack, lowpass(12500, 6) / (1 + 1j * HZ / 7000) ** 2)
    return body + snap * undb(19.5)


def rustles_and_bird():
    """Scrapes, rustles and one faint bird note, each a short swell in a band of grainy noise."""
    out, grain = 0, noise(3000)
    for start, length, db, hz, width in RUSTLES_AND_BIRD:
        swell = np.sin(np.pi * np.clip((T - start) / length, 0, 1) ** .6) ** .8
        band = through(grain, bandpass(hz, width) * lowpass(12500, 6))
        out = out + unit(band) * swell * undb(db + 1.6 * wander(120))
    return out


def air_and_wind():
    """Faint garden air, with a breeze and gusts buffeting the microphone."""
    air = unit(through(noise(800), colour(GARDEN_COLOUR))) * undb(-66)
    breeze = undb(-67.5 + 2 * wander(4.3))
    gusts = sum(undb(db + 24 * (bump(middle, length) - 1)) for middle, length, db in GUSTS)
    return air + unit(through(noise(90), colour(WIND_COLOUR))) * (breeze + gusts)


def scene():
    """Mix the saw and the sounds around it over the outdoor background."""
    speed, turns = motor_motion()
    near = cutting(speed, turns) + free_running(speed, turns) + motor_tones(turns)
    near += blade_whistle(turns) + ground_echo() + offcut_drop() + knocks() + rustles_and_bird()
    # the saw is nearer the right side, so the left hears it later, except while it is lifted
    lag_samples = np.interp(T, [2.6, 3.1, 4.8, 5.1], [3, 0, 0, 4])
    near[0] = map_coordinates(near[0], [np.arange(N) - lag_samples], mode="nearest")
    return near + air_and_wind()


def record(dry):
    """The microphone clips the loudest peaks, and the highest treble is cut off."""
    ceiling, top_hz = .8, 15740
    treble_cut = signal.ellip(12, .2, 60, top_hz, fs=SR, output="sos")
    return signal.sosfilt(treble_cut, np.clip(dry, -ceiling, ceiling))


dry = scene()
out = record(dry)
to_wav(out)
```